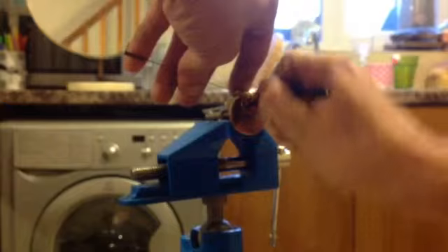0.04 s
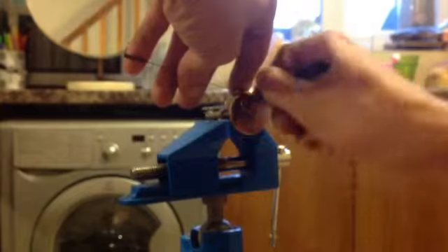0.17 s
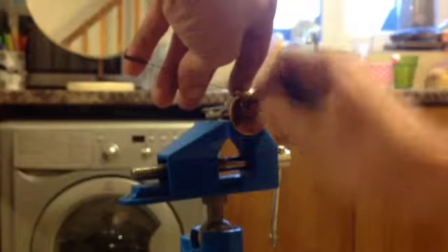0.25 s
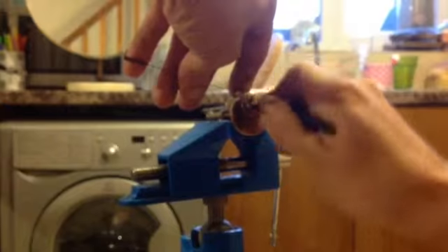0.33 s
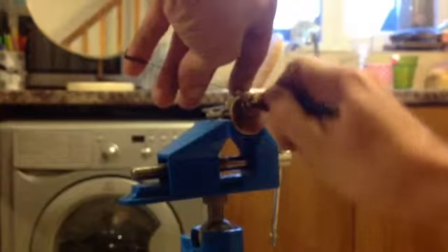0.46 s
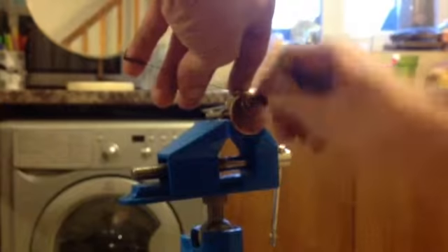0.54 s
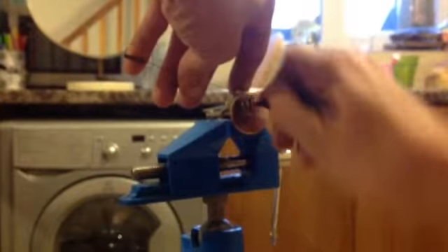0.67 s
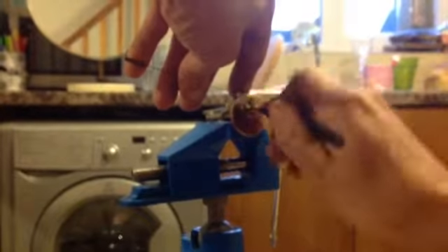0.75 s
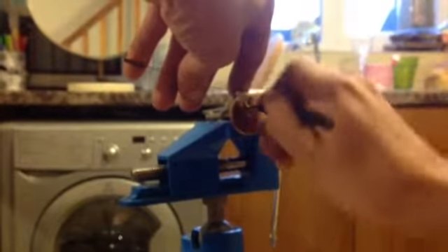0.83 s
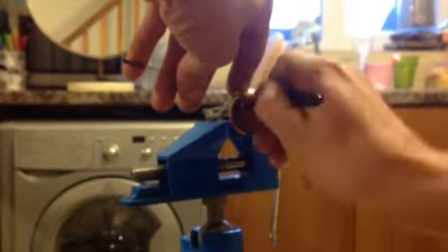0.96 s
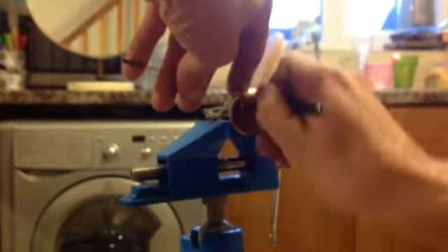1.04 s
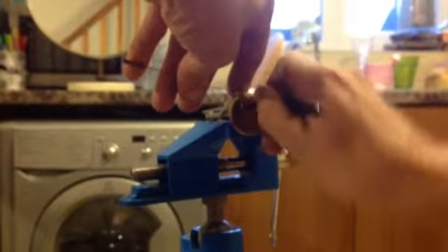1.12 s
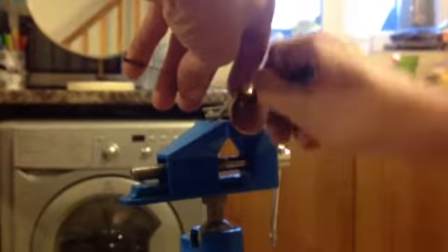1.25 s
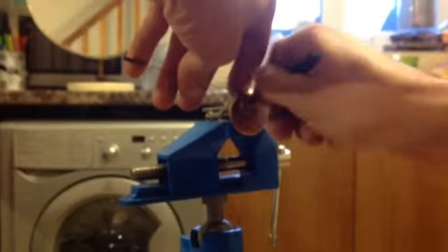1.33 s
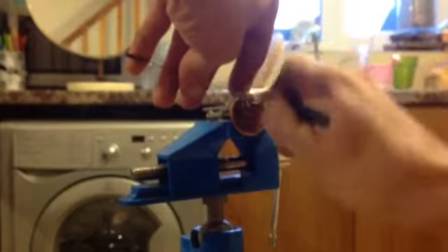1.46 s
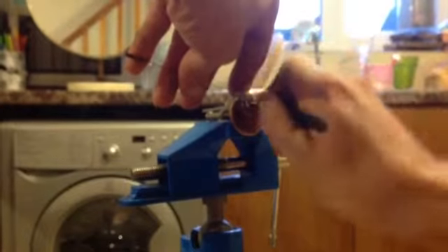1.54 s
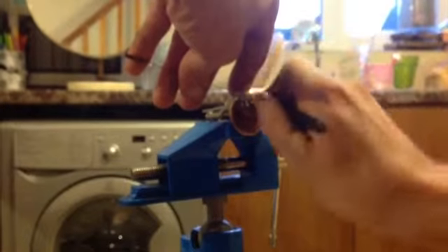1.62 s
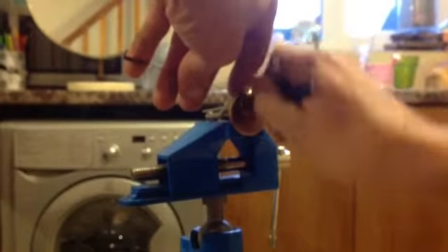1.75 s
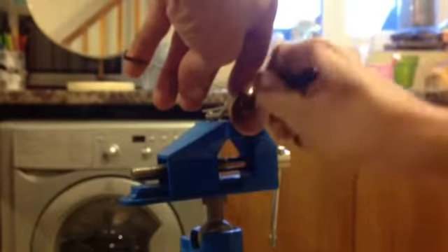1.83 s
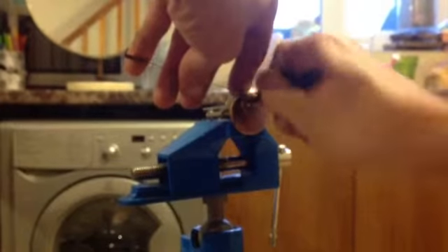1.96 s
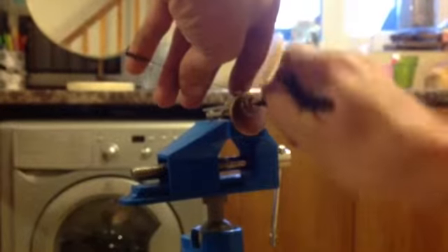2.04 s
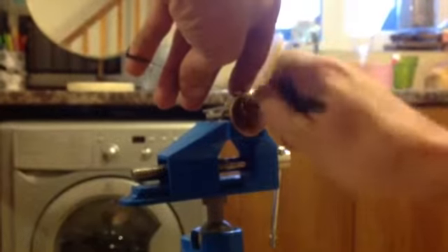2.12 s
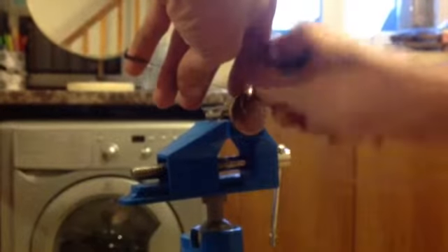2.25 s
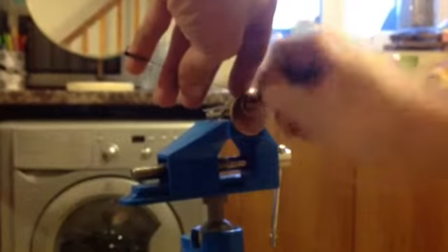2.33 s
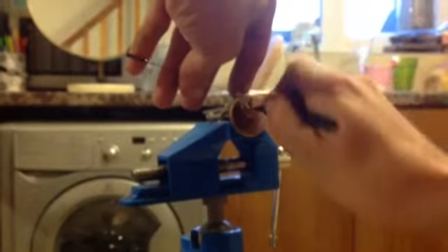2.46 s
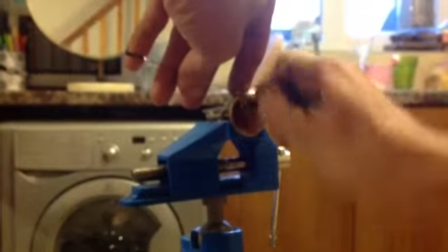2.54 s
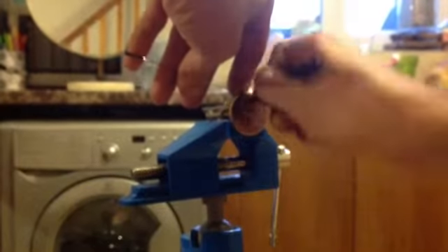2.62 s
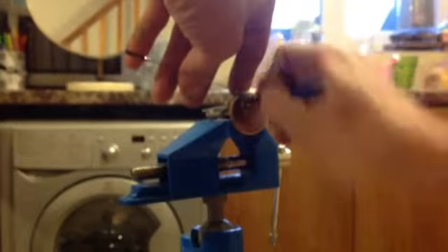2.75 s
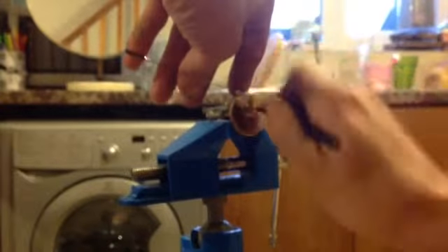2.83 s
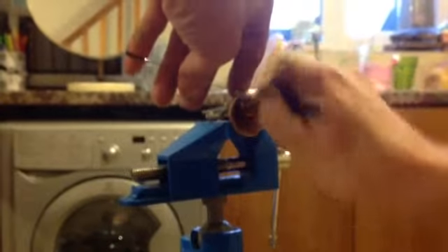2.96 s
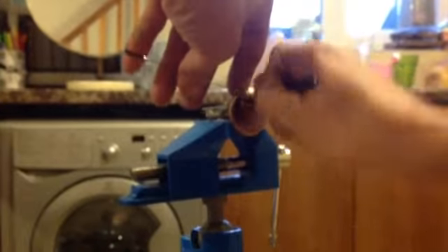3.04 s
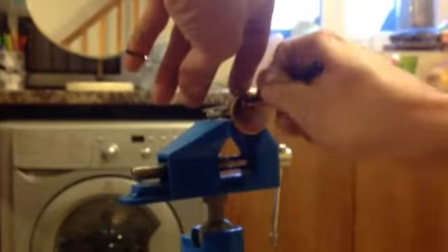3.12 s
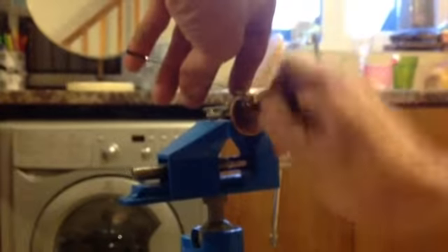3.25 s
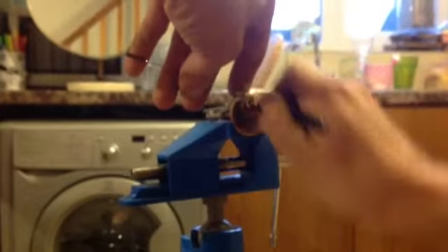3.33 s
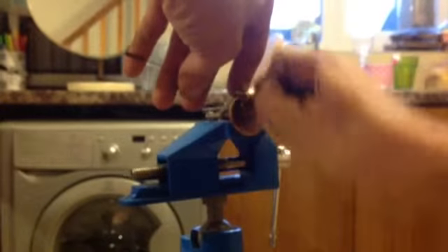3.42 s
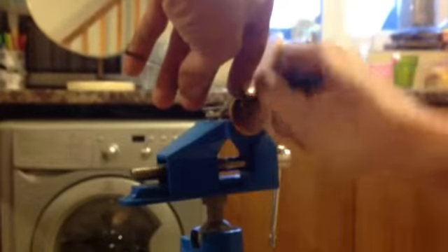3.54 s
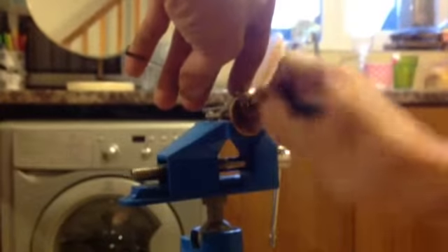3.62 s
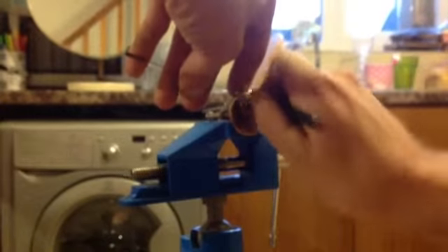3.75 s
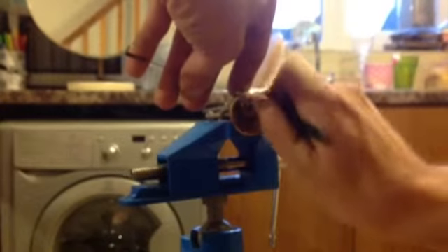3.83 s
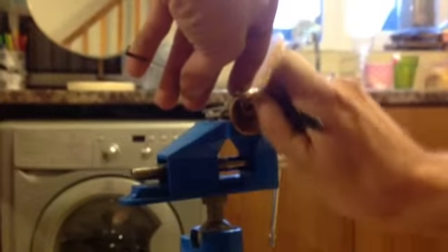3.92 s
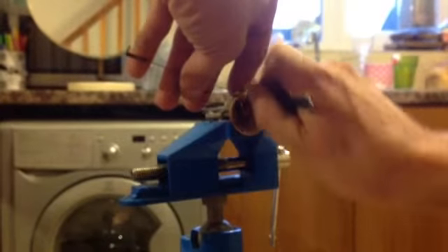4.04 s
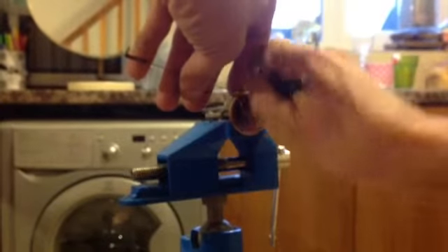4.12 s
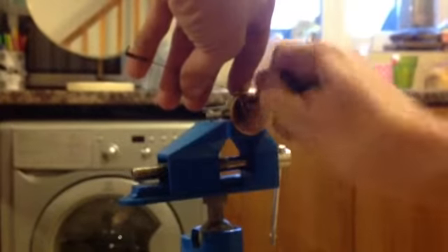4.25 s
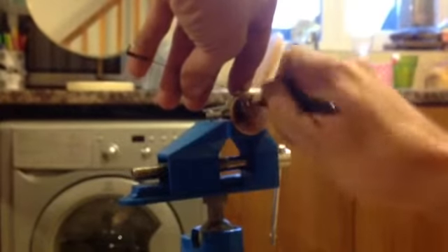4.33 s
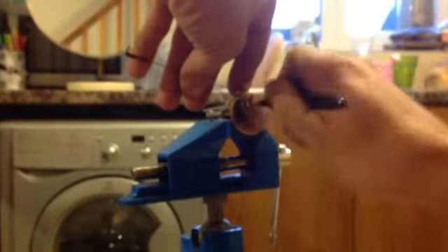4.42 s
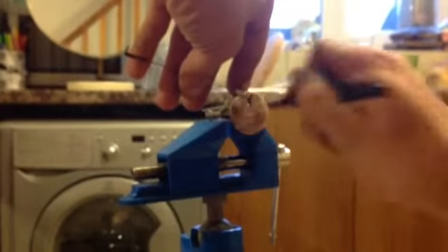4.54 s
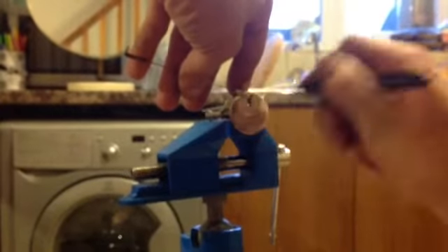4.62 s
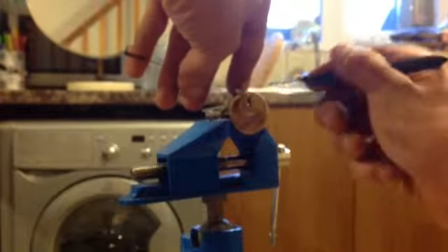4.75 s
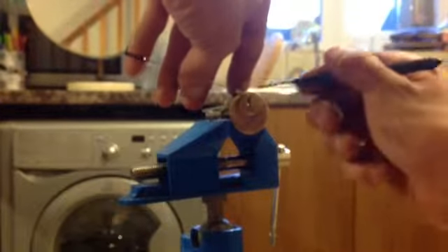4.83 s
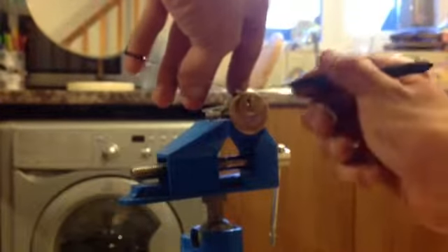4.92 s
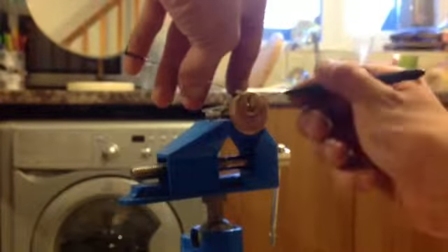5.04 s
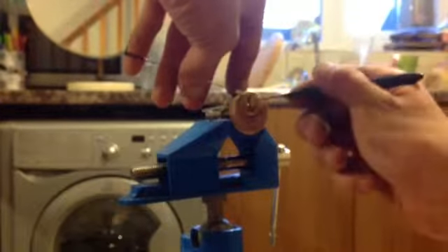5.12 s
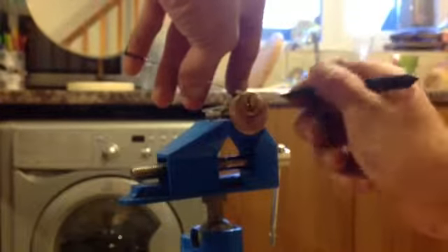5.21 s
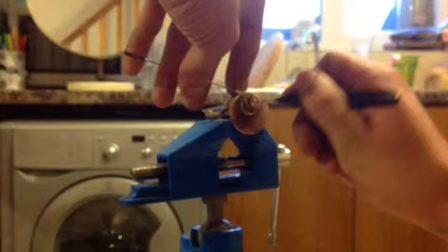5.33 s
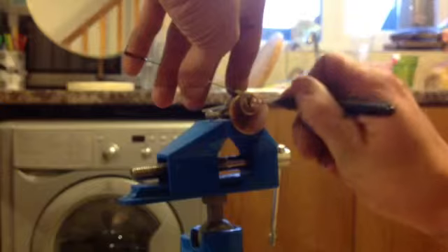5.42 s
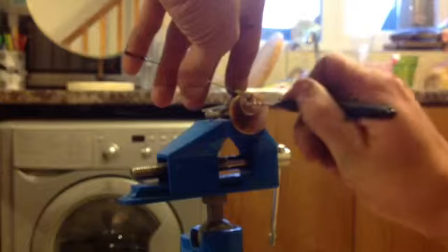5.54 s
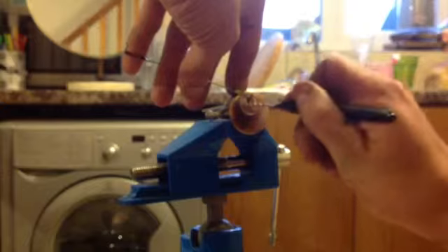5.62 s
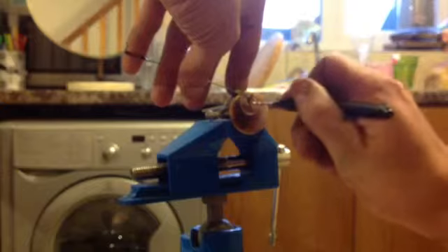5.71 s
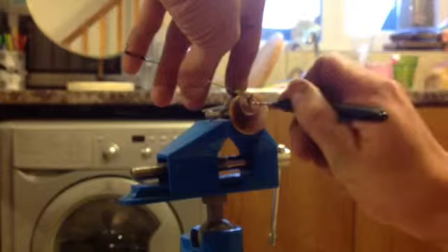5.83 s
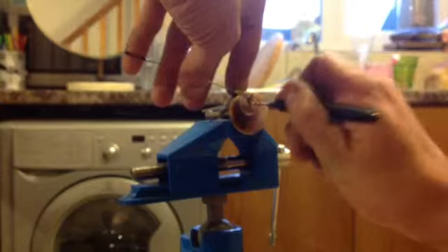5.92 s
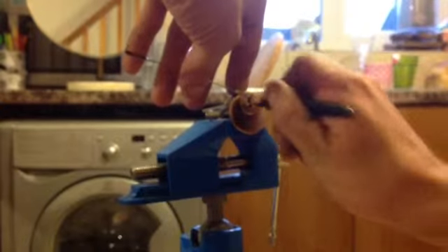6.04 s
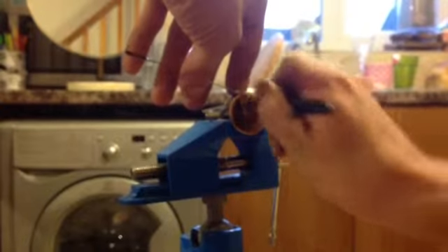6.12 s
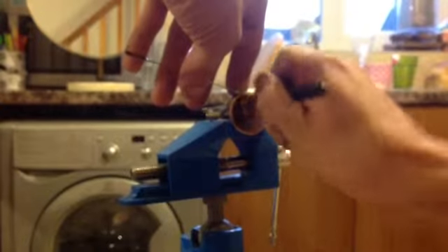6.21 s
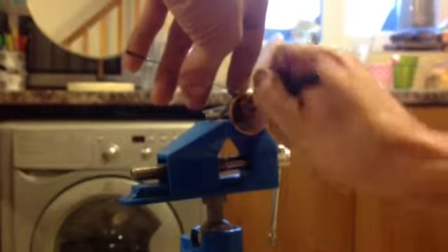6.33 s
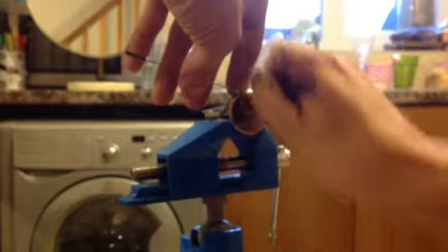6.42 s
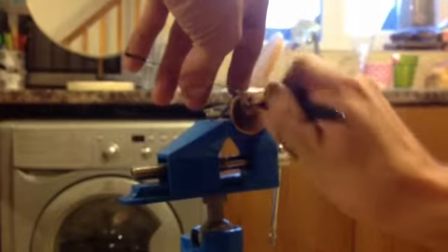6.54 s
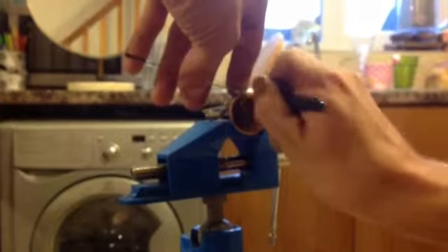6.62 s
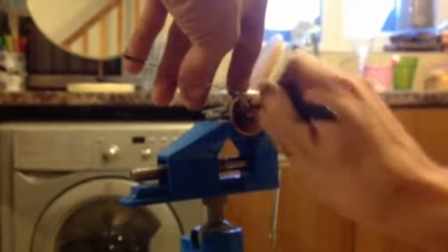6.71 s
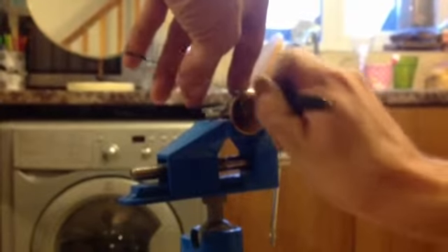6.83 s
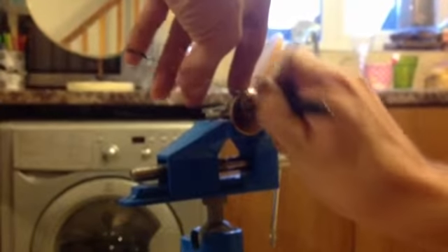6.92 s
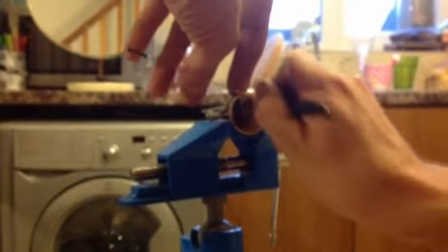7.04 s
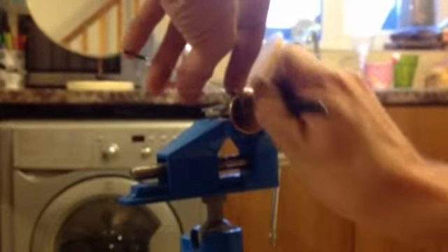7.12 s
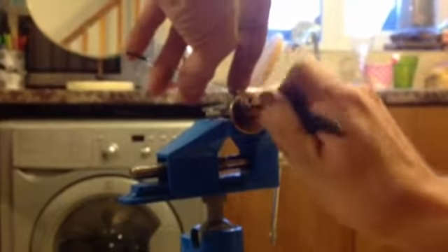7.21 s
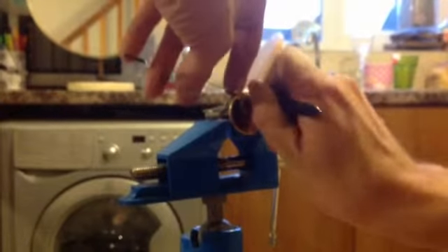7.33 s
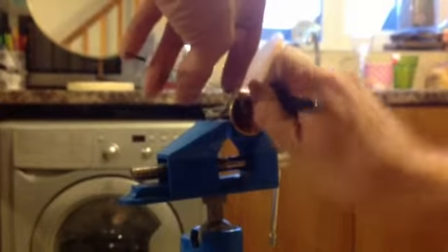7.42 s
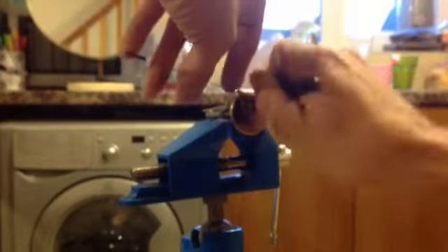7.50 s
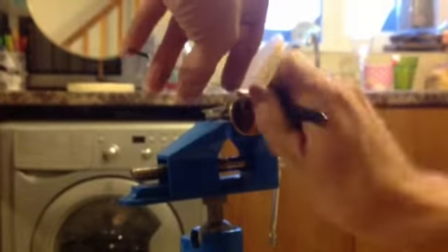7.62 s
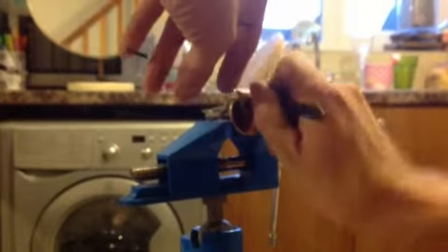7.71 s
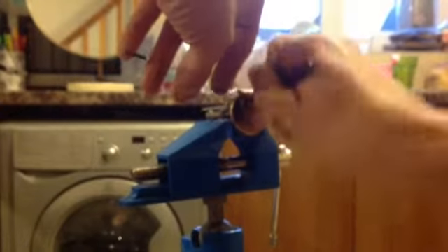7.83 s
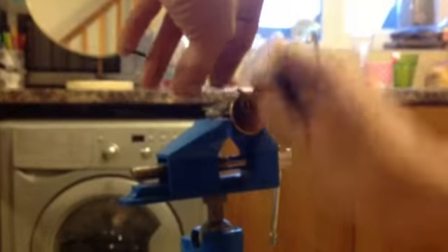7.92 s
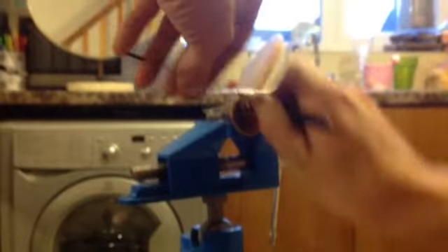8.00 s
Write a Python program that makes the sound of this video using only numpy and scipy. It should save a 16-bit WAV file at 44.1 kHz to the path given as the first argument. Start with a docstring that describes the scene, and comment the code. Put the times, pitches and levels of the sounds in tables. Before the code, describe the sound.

Rapid, uneven metal rattling, around seven strokes a second: short rasps, crisp clicks and small clacks from a lock, each hard shove knocking dully through the vice beneath. A few snaps leave a thin, high spring singing. The scrubbing breaks off midway for over a second, with only light ticks over a constant mid-pitched whine, then starts again just as busily. Close microphone, short lively kitchen reflections, no deep bass.

```python
"""In a kitchen, a steel rake is scrubbed in and out of a lock cylinder clamped in a small vice.
Its teeth scrape along the keyway as irregular slips, and snap over sprung pins as short bursts of force;
both ring the damped modes of lock, jaws and stand. Midway the rake is drawn out and the scrubbing pauses.
A spring sings on after a few snaps, and shoves of the hand thud through the vice into its stand.
An appliance whines almost steadily behind, made of two sine tones over coloured noise."""
import sys
import numpy as np
from scipy import signal
from scipy.fft import rfft, irfft, next_fast_len
from scipy.io import wavfile
from scipy.ndimage import map_coordinates

SR = 44100
rng = np.random.default_rng(int(sys.argv[2]) if len(sys.argv) > 2 else 0)


def wav_record(signal):
    """Record a signal, one row per channel, as 16-bit PCM in the file named by sys.argv[1]."""
    frames = np.transpose(np.atleast_2d(signal))
    bounded = np.clip(frames, -1, 1)
    # unit amplitude maps onto the largest positive 16-bit level
    quanta = np.round(bounded * 32767).astype(np.int16)
    wavfile.write(sys.argv[1], SR, quanta)


N = 355754
TIME = np.arange(N) / SR
BLOW_TIME = np.arange(SR // 8) / SR  # seconds within one blow

# All levels in the tables are set before the final mix; decay_s is the time to fall by 60 dB,
# before any extra damping by the hands or the contact.
# Ringing modes of the lock with the rake in it: pitch_hz, level_db, decay_s
LOCK_MODES = [(1512, -3, 0.15), (1685, -1, 0.072), (1730, -1.5, 0.11), (2111, -4.5, 0.058),
              (2187, -4, 0.038), (2275, -4.5, 0.033), (2486, -3, 0.026), (2656, -14, 0.0073),
              (2789, -3.5, 0.03), (3188, -2, 0.012)]
# Ringing modes of the vice's jaws: pitch_hz, level_db, decay_s
JAW_MODES = [(537, -3.5, 0.069), (647, -5.5, 0.042), (744, -10.5, 0.13), (841, 1, 0.07), (1020, -5, 0.036),
             (1187, 2, 0.03)]
# Ringing modes of the vice on its stand: pitch_hz, level_db, decay_s
STAND_MODES = [(86, -20, 0.072), (134, -5, 0.2), (168.1, 2, 0.17), (195, -1.5, 0.15), (228.4, 2, 0.08),
               (269, -1, 0.082), (317, -8.5, 0.098), (383.6, 0, 0.15), (443.2, -0.5, 0.11)]
# Colour of the crack where steel meets brass: frequency_hz, level_db
CRACK_COLOUR = [(1500, -60), (2500, -25), (3200, -2), (3750, 0), (4400, -4), (5300, -1), (6400, -4),
                (7400, -9), (8400, -28), (10000, -60)]
# Colour of the higher tick of the same contact: frequency_hz, level_db
TICK_COLOUR = [(5000, -50), (6500, -22), (7500, -1), (8600, -4), (9600, -3), (10500, 2), (11400, -2),
               (12400, -8), (13400, -6), (14400, -1), (15200, -2), (16500, -25)]
# Strokes of the rake, in or out: start_s, end_s, grating_db (teeth), drag_db (hands), hardness_db
STROKES = [(0, 0.137, -56.5, -47.5, 0), (0.271, 0.369, -45, -46.5, -3), (0.38, 0.505, -58, -53.5, 0),
           (0.545, 0.608, -46.5, -46, 0), (0.675, 0.81, -46.5, -43, -2), (0.852, 0.992, -47, -44, -1.5),
           (1.098, 1.208, -59.5, -49.5, 0), (1.245, 1.27, -57.5, -53, 11), (1.397, 1.486, -44, -41.5, 1.5),
           (1.488, 1.562, -42, -44, -4), (1.6, 1.66, -65, -46, -2), (1.686, 1.78, -49.5, -42.5, 1),
           (1.811, 1.926, -66, -57, -5), (1.975, 2.075, -45, -43, 1), (2.11, 2.216, -44, -41.5, -2.5),
           (2.287, 2.453, -49.5, -41, -2), (2.452, 2.65, -50.5, -45, -0.5),
           (2.682, 2.794, -52.5, -50.5, -1), (2.815, 2.94, -45.5, -44.5, -1), (2.949, 3.012, -40, -37, 0),
           (3.08, 3.175, -48.5, -42, 2), (3.259, 3.347, -46.5, -37.5, -1), (3.371, 3.53, -48, -42, -9),
           (3.601, 3.73, -51, -49, -2), (3.796, 3.876, -52.5, -51.5, 5), (4.045, 4.14, -57.5, -51.5, 1),
           (4.261, 4.414, -46.5, -39.5, -2), (4.491, 4.543, -41.5, -37, -0.5),
           (5.224, 5.318, -66, -58.5, -5), (5.67, 5.71, -64, -54, -7), (5.963, 6.093, -53.5, -44, 0.5),
           (6.086, 6.23, -47.5, -42.5, -2), (6.274, 6.32, -49.5, -46, -1.5), (6.367, 6.492, -51, -40, -10),
           (6.499, 6.567, -44.5, -35, 2.5), (6.58, 6.683, -45, -47, -2.5), (6.739, 6.887, -45, -41, 0),
           (6.96, 7.146, -48, -44, -1), (7.171, 7.26, -50, -45, 0), (7.299, 7.37, -43.5, -41, -0.5),
           (7.44, 7.534, -52, -45.5, 1.5), (7.624, 7.75, -55.5, -44.5, -1), (7.762, 7.885, -46.5, -47, -2),
           (7.957, 8.07, -40.5, -39, -6)]
# The rake snapping over pins or tapping the lock:
# start_s, level_db, ring_centre_hz, hardness_db, knock_db (jaws, relative to level_db)
SNAPS = [(0.028, -47, 2110, 3, -8), (0.06, -44.5, 2180, -12, -16), (0.105, -38, 1960, 7.5, -23),
         (0.268, -42, 2190, 4, -9), (0.287, -38, 2110, 9.5, -5), (0.318, -30, 1930, -1, -10),
         (0.348, -43, 2120, -6, -14), (0.5127, -30.5, 2060, -6, -19), (0.55, -28.5, 2730, 1, -12),
         (0.7003, -40.5, 2130, -9, -4), (0.73, -35.5, 2150, 7, -12), (0.7696, -32, 1630, 4, -6),
         (0.853, -31, 2390, -3.5, -31), (0.885, -40, 1880, 1, -4), (0.9342, -34.5, 1810, -1, -8),
         (0.9718, -36, 2240, -14, -22), (1.0015, -39.0, 1820, -5, 0), (1.051, -41.5, 2116, -6, -1.5),
         (1.12, -49, 2320, 3, -4), (1.253, -44, 2470, 12, -4), (1.364, -45.5, 1830, 2, -6),
         (1.404, -31, 1800, -1, -9), (1.44, -41.5, 2040, 11, -19), (1.491, -25.5, 2253, -7, -13.5),
         (1.502, -31, 2270, 1, -16), (1.5274, -30, 2003, -6, -13.5), (1.5473, -36, 1840, -4, -11),
         (1.613, -39, 2360, -0.5, -3), (1.699, -36.5, 2200, -0.5, -2), (1.739, -36, 2270, -4, -27),
         (1.831, -46.0, 2080, -8, -9), (1.9684, -37.5, 1890, -1.5, -7), (1.987, -33.5, 2080, 2, 0),
         (2.0027, -37.5, 2160, 2, -11), (2.056, -46.5, 2180, 10, -17), (2.162, -29.5, 2100, -16, -10),
         (2.27, -40, 1860, 0, -7), (2.3, -35, 1770, -4.5, -7), (2.377, -42, 2120, 9.5, -0.5),
         (2.4566, -31, 2290, 10, -5.5), (2.512, -39.5, 2200, 2, -7), (2.565, -40, 2204, 0, -12),
         (2.607, -39.5, 1930, 7.5, -2), (2.6828, -29.5, 1890, 5.5, -5.5), (2.842, -37.0, 2280, -3, -7),
         (2.859, -32.0, 2470, -9, -8.5), (2.873, -34.5, 2330, -10, -28), (2.96, -32, 2040, -2, -13),
         (3.081, -39.5, 1900, 3, -9), (3.0958, -34.5, 2150, 8, -8), (3.17, -42, 2030, 4.5, 1),
         (3.257, -45.0, 1840, -6, -4), (3.273, -30, 2370, -2.5, -13), (3.2936, -29.5, 2510, 1.5, -14),
         (3.335, -38.5, 2270, -16, -14), (3.425, -41.5, 2220, 2.5, 0), (3.474, -32, 1980, 5.5, -7),
         (3.581, -49.5, 1850, -6, 4), (3.63, -45, 2050, 2.5, -7), (3.6715, -33, 2137, 3, -13.5),
         (3.76, -44, 2420, 0, -16), (3.801, -24.5, 2140, -4, -16), (3.83, -40.5, 1770, -11, 5),
         (3.838, -40.5, 2340, 4.5, -8), (3.952, -50, 2440, 2, -19), (3.982, -58.5, 2070, 9.5, 10),
         (4.043, -35.0, 2084, -1, -7.5), (4.1056, -49.5, 1730, -10, -5), (4.2577, -32.5, 1878, 5, -4),
         (4.315, -40.5, 2550, 1, -18), (4.3941, -39.5, 2310, -2, -4), (4.4116, -38, 2140, 1.5, -16),
         (4.5026, -43, 1820, 0, -15), (4.5204, -39.0, 2020, 4, -10), (4.5535, -53.5, 1900, 18.5, 0),
         (5.295, -49.5, 1690, -15, -1), (5.4442, -44.5, 1950, -38, -18), (5.526, -53.5, 2070, 12, -3.5),
         (5.648, -61.5, 2810, 13.5, -5), (5.6742, -53, 2510, 13, -3.5), (5.823, -60, 2080, -7, -6),
         (5.969, -44, 1770, -1, -6.5), (6.0085, -40, 1970, -4, -20), (6.018, -39, 1710, -15, -27),
         (6.099, -41.5, 1820, 5.5, -17), (6.141, -40, 2244, 4.5, -6), (6.2, -37, 1900, -13, -14),
         (6.287, -39.5, 1870, 1, -13), (6.373, -38.5, 1490, -4.5, -2.5), (6.464, -42.5, 1710, -15, -12),
         (6.497, -37, 2180, -3, -6), (6.506, -27.5, 2220, -1, -11), (6.518, -27.5, 2040, 3, -12),
         (6.579, -36.5, 2100, -4, -4), (6.651, -43, 2133, -1, -15), (6.7747, -33.0, 2470, 1, -9),
         (6.8267, -26, 1870, -3, -15), (6.8806, -38, 1705, -9, -15), (6.964, -26, 2220, 3, -14.5),
         (7.089, -40, 2270, 3, -14), (7.207, -40, 1960, 7.5, -1), (7.2851, -28, 1980, -6.5, -23),
         (7.2941, -37.5, 1808, -9, 7.5), (7.438, -39.5, 1890, -19, -0.5), (7.487, -42, 2000, 5.5, -5),
         (7.6313, -33, 1980, -0.5, -13), (7.72, -48.5, 1435, -13, 3), (7.7742, -36.5, 1820, 2.5, -5.5),
         (7.826, -42, 1986, 10, 0), (7.85, -34.0, 2050, -4, -6.5), (7.987, -28.5, 2070, -1.5, -7),
         (8.0567, -27.5, 1830, -5.5, -12)]

# The bands in which the small parts radiate
LOCK_BAND = signal.butter(2, (1500, 3600), "bandpass", fs=SR)
JAWS_BAND = signal.butter(2, (480, 1400), "bandpass", fs=SR)


def amp(db):
    """Decibels to gain."""
    return 10 ** (np.asarray(db) / 20)


def unit(x, size=None):
    """Scale x to an rms of 1 over its first size samples."""
    return x / np.sqrt(np.mean(x[:size] ** 2) + 1e-20)


def along(points, hz):
    """Read a curve of (Hz, value) points on a log frequency axis."""
    point_hz, values = np.transpose(points)
    return np.interp(np.log(hz + 1), np.log(point_hz), values)


def wobble(rate, t=TIME):
    """A smooth random curve with this many random knots a second."""
    knots = rng.standard_normal(int(t[-1] * rate) + 4)
    return map_coordinates(knots, [t * rate])


def coloured(x, gain):
    """Multiply the spectrum of x by a gain that depends on frequency."""
    size = next_fast_len(len(x) + 4096)
    spectrum = rfft(x, size) * gain(np.fft.rfftfreq(size, 1 / SR))
    return irfft(spectrum, size)[:len(x)]


def impulse(points, size=512):
    """A click with this spectrum that starts at once (minimum phase, by folding the cepstrum)."""
    cepstrum = irfft(np.log(amp(along(points, np.fft.rfftfreq(size, 1 / SR)))))
    cepstrum[1:size // 2] *= 2
    cepstrum[size // 2 + 1:] = 0
    return irfft(np.exp(rfft(cepstrum)))


def varied(points, scatter_db):
    """The same colour with its peaks randomly shifted in strength."""
    hz, db = np.transpose(points)
    return np.column_stack([hz, db + scatter_db * rng.standard_normal(len(db))])


def ring(modes, t, centre_hz=None, octaves=1, scatter_db=3, detune=0.025):
    """Damped modes at fresh strengths; the point of contact favours those near centre_hz."""
    hz, db, decay_s = np.transpose(modes)
    size, shift, side = rng.standard_normal((3, len(hz)))
    gain = amp(db + scatter_db * size) * np.sign(side)
    if centre_hz:
        gain = gain / (1 + (np.log2(hz / centre_hz) / octaves) ** 2)
    tones = np.sin(2 * np.pi * np.outer(hz * (1 + detune * shift), t))
    return gain @ (tones * np.exp(-np.log(1000) * t / decay_s[:, None]))


def through(force, response):
    """A body's answer to a force: every instant of the force starts the response afresh."""
    return signal.fftconvolve(force, response)[:len(force)]


def radiated(body, band):
    """A small part radiates mainly within its own band."""
    return signal.lfilter(*band, body)


def add(track, s, sound):
    """Mix a sound into the track at time s, cutting it at the track's end."""
    part = track[max(round(s * SR), 0):][:len(sound)]
    part += sound[:len(part)]


def appliance():
    """A motor's slightly unsteady whine and hum over the air of the room."""
    # Noise of the quiet kitchen: frequency_hz, density_db (per Hz, relative)
    air_colour = [(25, -6), (70, -19), (120, -3), (170, 1), (260, 4), (450, -2), (900, -3.5), (1500, -6.5),
                  (4000, -14), (10000, -14.5), (15000, -15)]
    turn = 2 * np.pi * np.cumsum(1 + .0012 * wobble(6)) / SR  # phase of a 1 Hz turn, nearly steady
    whine = amp(-55.5 + 0.21 * wobble(4.74)) * np.sin(745 * turn)
    hum = amp(-73.5) * np.sin(258 * turn)
    air = unit(coloured(rng.standard_normal(N), lambda hz: amp(along(air_colour, hz))))
    return whine + hum + amp(-65) * air


def kitchen(x, count=48):
    """The room's diffuse answer: fading noise, drawn afresh for each short stretch so its colour varies."""
    # How long the room rings: frequency_hz, decay_s (to fall by 60 dB)
    room_decay = [(100, 0.18), (400, 0.4), (2000, 0.24), (7000, 0.37), (15000, 0.18)]
    out, step = np.zeros(N), N // count + 1
    for start in range(0, N, step):
        hz, t, noise = signal.stft(rng.standard_normal(SR // 2), SR, nperseg=256)
        fade = amp(-60 * t / along(room_decay, hz)[:, None])
        tail = signal.istft(noise * fade, SR, nperseg=256)[1]
        answer = signal.fftconvolve(x[start:start + step], tail / np.linalg.norm(tail))
        add(out, start / SR + .005, answer)  # the room answers 5 ms late
    return out


def thud(centre_hz):
    """A soft push of a few milliseconds rocks the vice's low modes and jogs its jaws."""
    push_band = signal.butter(1, 100, "highpass", fs=SR)
    grip_s = 0.071  # time constant with which the hands damp the shake
    noise = rng.standard_normal(len(BLOW_TIME))
    push = signal.lfilter(*push_band, noise * BLOW_TIME * np.exp(-BLOW_TIME / 0.0021))
    stand = ring(STAND_MODES, BLOW_TIME, centre_hz, octaves=0.45, scatter_db=1.5, detune=.01)
    stand *= np.exp(-BLOW_TIME / grip_s)
    jaws = ring(JAW_MODES, BLOW_TIME, centre_hz, octaves=0.85) * np.exp(-BLOW_TIME / 0.0039)
    jaws = radiated(jaws, JAWS_BAND)
    return unit(through(push, stand), size=970) + amp(-15.0) * unit(through(push, jaws), size=970)


def jolts():
    """The vice thuds at each hard shove, and more faintly at each loud snap."""
    # Hard shoves that jolt the vice: start_s, level_db, centre_hz
    shoves = [(0.032, -40.5, 240), (0.109, -39.5, 215), (0.331, -42, 370), (0.575, -35, 230),
              (0.633, -38.5, 200), (0.792, -32, 190), (0.936, -32.5, 169), (1.003, -34.5, 230),
              (1.054, -44.5, 199.6), (1.407, -39, 342), (1.453, -39, 260), (1.613, -39.5, 198),
              (1.732, -45, 260), (1.994, -33.0, 270), (2.041, -33.0, 262), (2.126, -37, 221),
              (2.17, -40.5, 293.4), (2.328, -41.0, 270), (2.461, -32, 270), (2.515, -33.5, 234),
              (2.578, -39, 200), (2.619, -35.5, 237), (2.687, -33, 252), (2.885, -34, 230),
              (3.008, -26.5, 227.4), (3.1, -34.5, 340.6), (3.28, -32, 298), (3.381, -34, 210),
              (3.478, -38, 290), (3.634, -36.5, 218), (4.271, -41, 256), (4.416, -34.5, 244.6),
              (4.509, -34, 230), (4.536, -34, 222), (6.287, -38.0, 280), (6.375, -31, 190),
              (6.419, -41.5, 239.6), (6.529, -32.5, 201), (6.6, -39.5, 193), (6.769, -39, 221),
              (6.796, -37.0, 190), (6.838, -32.5, 230.5), (6.863, -34, 180), (7.063, -34, 200),
              (7.083, -38.5, 220), (7.311, -33.5, 199.6), (7.341, -34.5, 255), (7.505, -37.5, 201),
              (7.658, -34, 207), (7.777, -45.5, 250), (7.85, -34.0, 183), (7.985, -40, 300)]
    rock_db, rock_hz = -5.5, 270  # thud of a snap: level over its knock, centre of its pitch
    out = np.zeros(N)
    for s, db, centre_hz in shoves:
        add(out, s - .003, amp(db - 0.42) * thud(centre_hz))  # the push builds up just before the thud
    for s, db, _, _, knock_db in SNAPS:
        add(out, s, amp(db + knock_db + rock_db) * thud(rock_hz))
    return out


def springs():
    """A released coil sings on in beating modes, buzzing against the wall of its bore."""
    # A pin spring set ringing: start_s, pitch_hz, level_db
    releases = [(.731, 11800, -59), (1.492, 8306, -52), (1.699, 8306, -68), (2.457, 8306, -66),
                (3.273, 8306, -55), (4.259, 8306, -64), (6.507, 8306, -67)]
    # Modes of a spring: pitch_ratio (to its own pitch), level_db, decay_s
    coil_modes = [(1, 0, .3), (1.006, -1, .3), (.99, -4, .15), (1.016, -6, .15)]
    out, t = np.zeros(N), np.arange(SR // 2) / SR
    for s, hz, db in releases:
        song = ring(np.multiply(coil_modes, [hz, 1, 1]), t, scatter_db=7, detune=0.00044)
        buzz = amp(2.3 * wobble(150, t)) * (1 - np.exp(-t / 0.033))  # swells in with a rough level
        add(out, s, amp(db) * unit(song * buzz, size=2000))
    return out


def judder():
    """As the rake is drawn back, regular slips ring its blade and quicken as it gathers speed."""
    # Judders of the rake: start_s, end_s, first_slips_per_s, last_slips_per_s, level_db
    judders = [(0.349, 0.497, 48, 85, -48), (1.116, 1.178, 50, 130, -50.5)]
    # Modes of the juddering rake: pitch_hz, level_db, decay_s
    blade_modes = [(465, -3.5, 0.05), (2130, -4.5, 0.038), (2270, -7, .022)]
    out = np.zeros(N)
    for start, end, first, last, db in judders:
        phase = np.cumsum(np.linspace(first, last, round((end - start) * SR))) / SR
        bursts = rng.standard_normal(len(phase)) * np.exp(-(phase % 1) / 0.17)  # one per slip
        force = np.pad(bursts, (0, len(BLOW_TIME)))
        blade_body = ring(blade_modes, BLOW_TIME, scatter_db=0.5)
        blade = unit(through(force, blade_body), size=len(phase))
        tick = unit(through(force, impulse(TICK_COLOUR)), size=len(phase))
        add(out, start, amp(db) * (blade + amp(-24) * tick))
    return out


def slips(rate, spread_db):
    """Stick-slip of the rake: irregular impulses that bunch into little ticks, and those into catches."""
    bunching_db = spread_db * np.tanh(wobble(260)) + 3 * np.tanh(wobble(70))
    sizes = rng.choice([-1, 1], N) * amp(bunching_db)
    return unit((rng.random(N) < rate / SR) * sizes)  # rate: mean slips a second


def pressure(levels_db, release_s):
    """Strength of the strokes through time: a quick bite, a slow sag, then a fall of 60 dB in release_s."""
    bite_s, sag_db_per_s = 0.008, 42
    power, t = np.zeros(N), np.arange(SR // 2) / SR
    for (start, end, *_), db in zip(STROKES, levels_db):
        length = end - start
        sag_db = -sag_db_per_s * (t - length / 2)  # goes on during the release
        release_db = -60 * np.maximum(t - length, 0) / release_s
        strength = np.minimum(t / bite_s, 1) * amp(db + (sag_db + release_db))
        add(power, start, strength ** 2)
    return np.sqrt(power)


def drifting_shares(count):
    """Randomly drifting weights of several points of contact."""
    return amp(8 * np.array([wobble(14) for _ in range(count)]))


def rubbed(force, modes, damping_s, band=([1], [1]), count=3):
    """A body's answer to a sliding contact: the mix of modes drifts as the contact moves."""
    shares = drifting_shares(count)
    answers = []
    for _ in range(count):
        body = ring(modes, BLOW_TIME, scatter_db=0.0, detune=0.01)
        body = radiated(body * amp(-60 * BLOW_TIME / damping_s), band)  # the contact damps the ring
        answers.append(through(force, body / np.linalg.norm(body)))
    return np.sum(shares * np.array(answers), 0) / np.linalg.norm(shares, axis=0)


def grit(force, count=3):
    """The bright rasp of steel on brass; its colour drifts as the contact moves."""
    shares = drifting_shares(count)
    answers = []
    for _ in range(count):
        crack = impulse(varied(CRACK_COLOUR, scatter_db=3.5))
        tick = impulse(varied(TICK_COLOUR, scatter_db=3.5))
        rasp = amp(-8.0) * crack / np.linalg.norm(crack) + amp(-12) * tick / np.linalg.norm(tick)
        answers.append(through(force, rasp))
    return np.sum(shares * np.array(answers), 0) / np.sum(shares, 0)


def scrape():
    """Teeth grate along the keyway, grittier on a hard stroke; the drag rumbles in the vice."""
    _, _, grate_db, drag_db, hardness = np.transpose(STROKES)
    teeth = amp(-1.5) * slips(rate=2000, spread_db=5)
    grate = teeth * pressure(grate_db, release_s=0.28)
    bite = teeth * pressure(grate_db + hardness, release_s=0.28)
    drag = amp(-1.5) * slips(rate=1100, spread_db=9.0) * pressure(drag_db, release_s=0.21)
    lock = amp(-1.6) * rubbed(grate, LOCK_MODES, damping_s=0.033, band=LOCK_BAND)
    jaw_force = amp(-8.5) * grate + amp(-13.5) * drag
    jaws = rubbed(jaw_force, JAW_MODES, damping_s=0.14, band=JAWS_BAND)
    stand = amp(-1.0) * rubbed(drag, STAND_MODES, damping_s=0.31)
    return lock + jaws + grit(bite) + stand


def chatter(life, spiky_db, settle_db, settle, first_db=19):
    """Force of one snap: a first impact, a burst of tiny ones, then a clumpy rattle as the pin settles."""
    size = len(BLOW_TIME)
    grains = rng.standard_normal(size) * amp(spiky_db * rng.standard_normal(size))
    clumps = amp(5 * wobble(350, BLOW_TIME))
    rattle = clumps * amp(settle_db - 60 * BLOW_TIME / settle)
    burst = np.exp(-(BLOW_TIME / life) ** 2)
    return amp(first_db) * (BLOW_TIME == 0) + grains * (burst + rattle)


def snap(centre_hz, hardness, knock_db):
    """One snap rings the lock, knocks the jaws and spits a crack that is brighter the harder the contact."""
    crack_db = -10.5 + 0.72 * hardness
    tick_db = -18 + 1.48 * hardness  # the higher tick grows faster, so hard snaps are brighter
    force = chatter(life=0.0044, spiky_db=3.0, settle_db=-3.5, settle=0.04)
    lock = ring(LOCK_MODES, BLOW_TIME, centre_hz, octaves=0.36, scatter_db=1.5, detune=0.0053)
    # Most of the ring is stopped as the pin meets the next tooth
    lock *= np.exp(-BLOW_TIME / 0.0091) + amp(-24.5)
    jaws = ring(JAW_MODES, BLOW_TIME, scatter_db=4.0, detune=0.016)
    jaws *= np.exp(-BLOW_TIME / 0.0031) + amp(-10)
    parts = [(radiated(jaws, JAWS_BAND), knock_db),
             (radiated(lock, LOCK_BAND), -.5),
             (impulse(varied(CRACK_COLOUR, scatter_db=6.5)), crack_db),
             (impulse(varied(TICK_COLOUR, scatter_db=4.5)), tick_db)]
    return sum(amp(db) * unit(through(force, body), size=353) for body, db in parts)  # level over 8 ms


def brushes():
    """Within each stroke the teeth also flick pins lightly, at chance moments."""
    slot_s = 1 / 16  # one flick falls at random within each slot
    level_db, spread_db = 3.5, 1  # over the stroke's grating
    out = np.zeros(N)
    for start, end, grate_db, _, hardness in STROKES:
        for slot in np.arange(start, end - slot_s, slot_s):
            size, edge, place = rng.standard_normal(3)
            flick = snap(2050 * 2 ** (0.19 * place), hardness + 5.0 * edge, knock_db=-10)
            flick_db = grate_db + level_db + spread_db * size
            add(out, slot + rng.random() * slot_s, amp(flick_db) * flick)
    return out


def pins():
    """The loud snaps: the rake jumps over a sprung pin or taps the lock."""
    out = np.zeros(N)
    for s, db, centre_hz, hardness, knock_db in SNAPS:
        add(out, s, amp(db) * snap(centre_hz, hardness, knock_db))
    return out


def scene():
    """Lock and vice close by, the kitchen around them."""
    metal = pins() + brushes() + springs() + scrape() + judder()
    thuds = jolts()
    room = kitchen(amp(-8.0) * metal + amp(-6) * thuds)
    return (metal + thuds + room + appliance())[None]


def record(dry):
    """The deep bass is thin, and the sound is band-limited: nothing from top_hz up."""
    top_hz = 15300

    def gain(hz):
        """Bass falls away below 100 Hz to a low floor; everything from top_hz up is cut."""
        bass_cut = 1 / np.sqrt(1 + (100 / (hz + 1)) ** 6)
        return (hz < top_hz) * (amp(-27.5) + bass_cut) / 0.95

    return np.array([coloured(channel, gain) for channel in dry])


dry = scene()
out = record(dry)
wav_record(out)
```